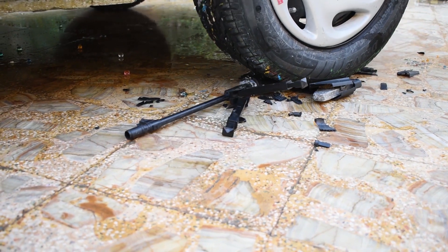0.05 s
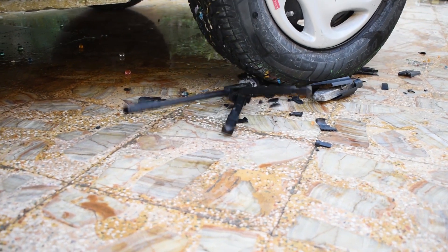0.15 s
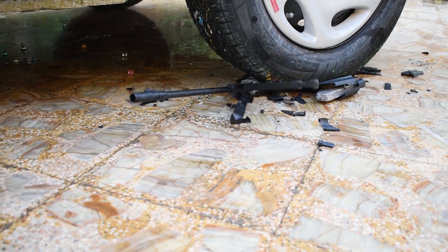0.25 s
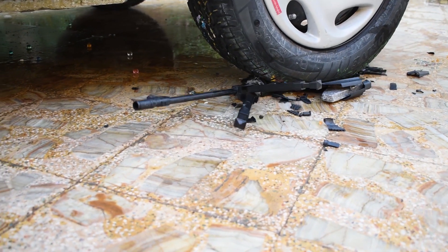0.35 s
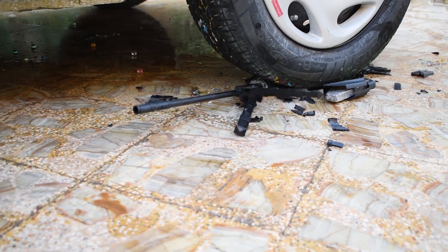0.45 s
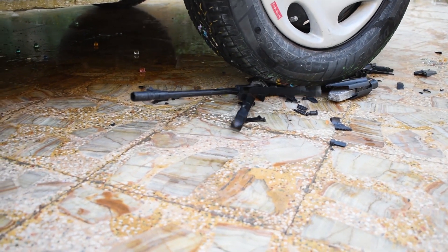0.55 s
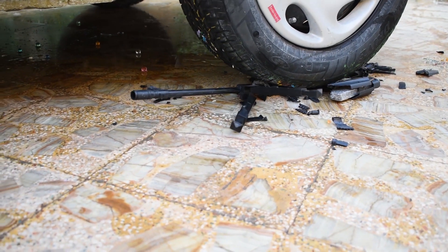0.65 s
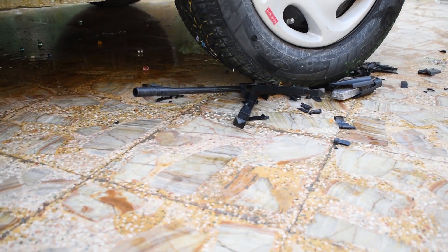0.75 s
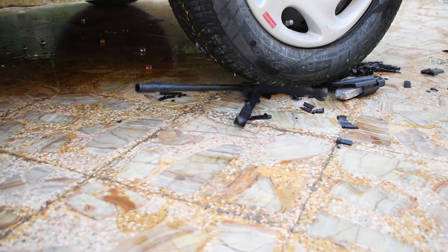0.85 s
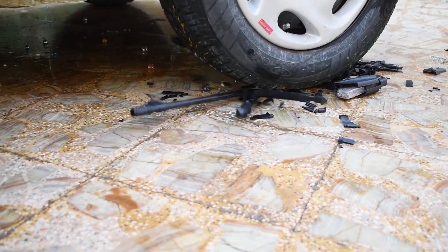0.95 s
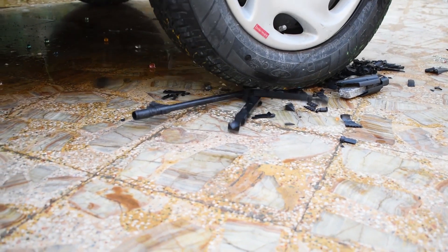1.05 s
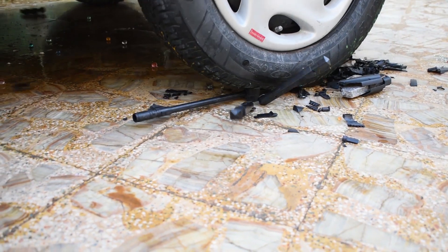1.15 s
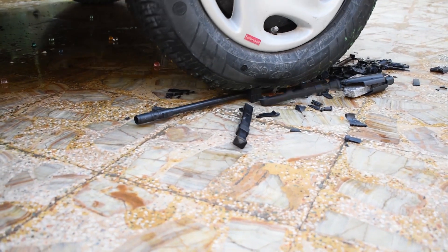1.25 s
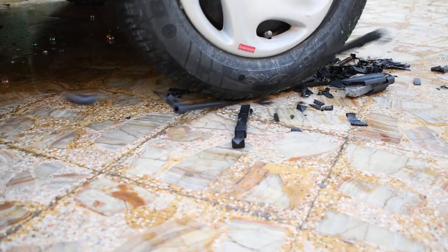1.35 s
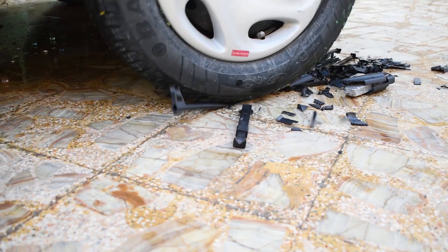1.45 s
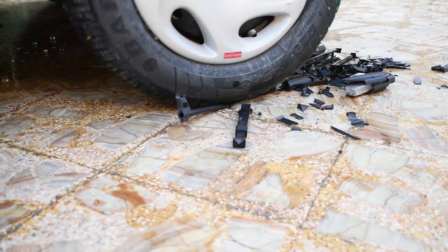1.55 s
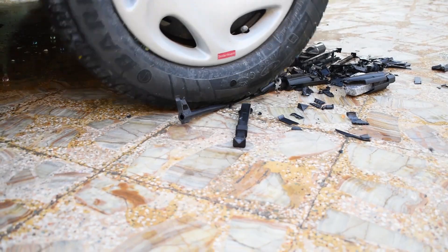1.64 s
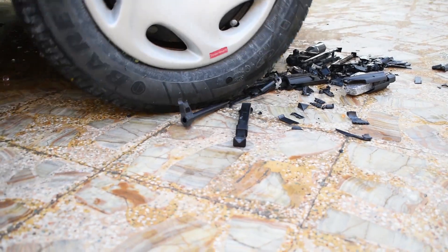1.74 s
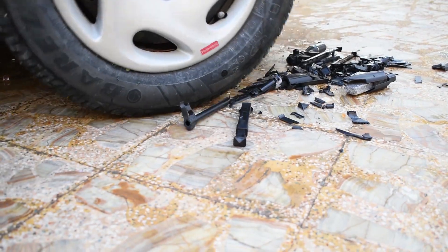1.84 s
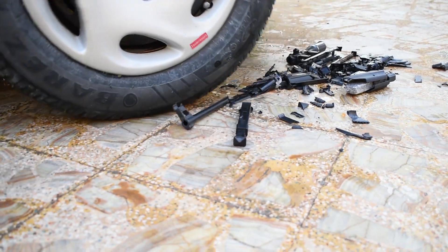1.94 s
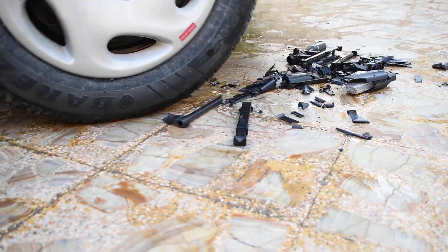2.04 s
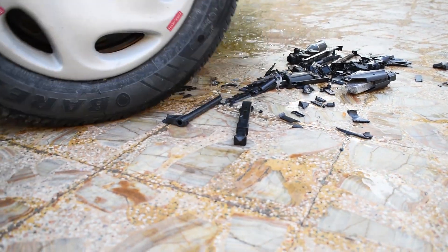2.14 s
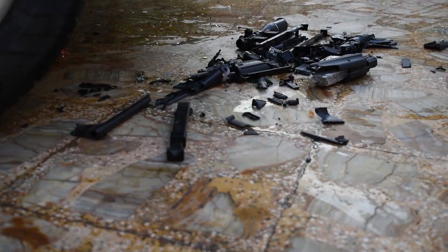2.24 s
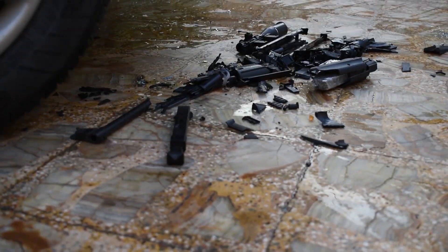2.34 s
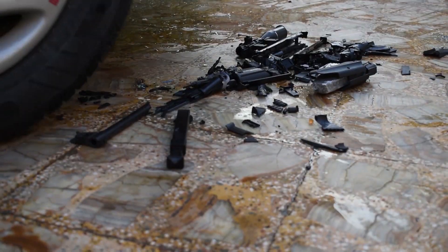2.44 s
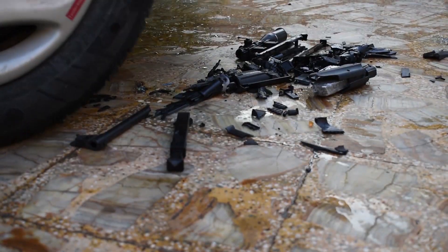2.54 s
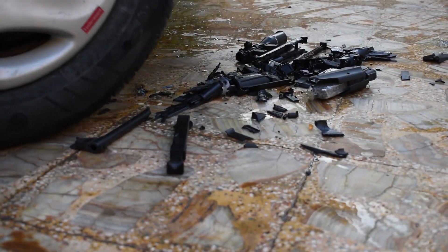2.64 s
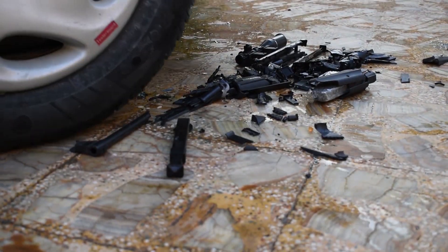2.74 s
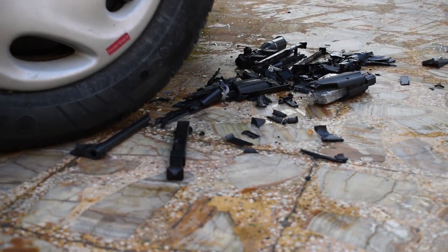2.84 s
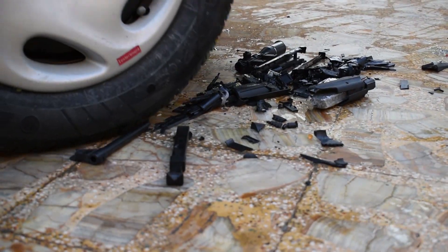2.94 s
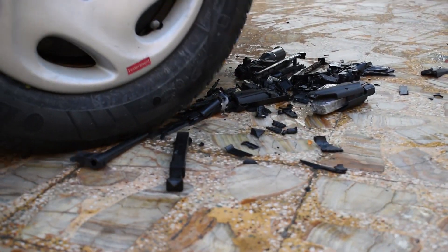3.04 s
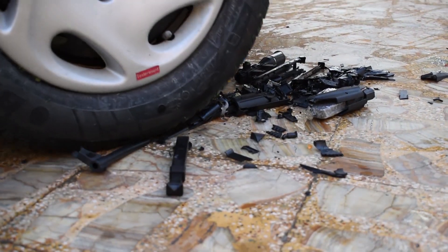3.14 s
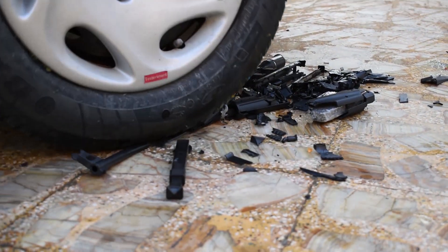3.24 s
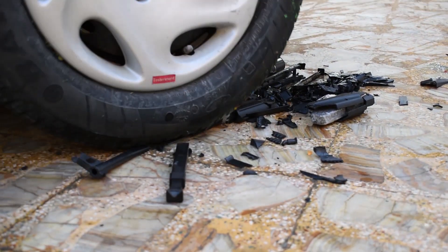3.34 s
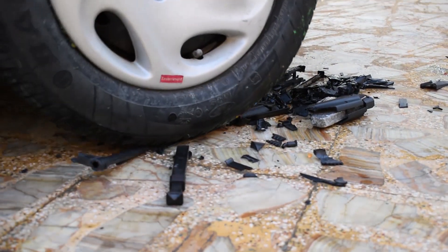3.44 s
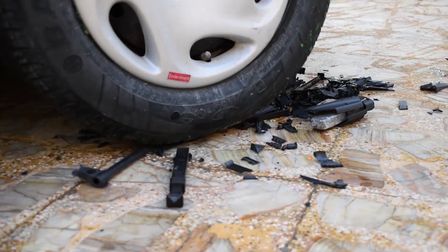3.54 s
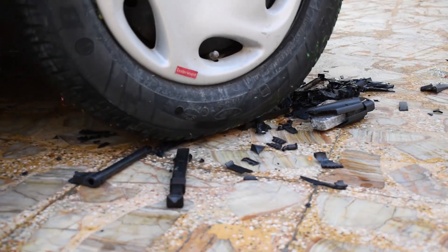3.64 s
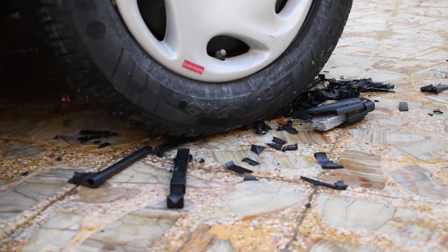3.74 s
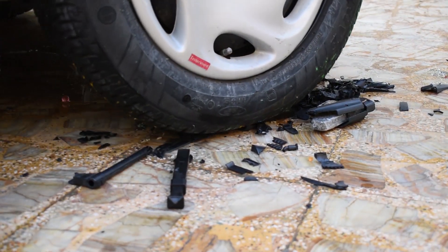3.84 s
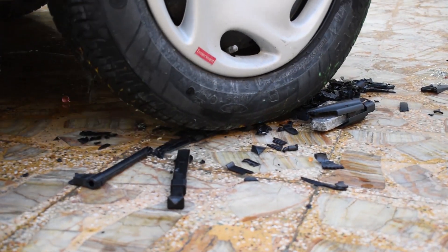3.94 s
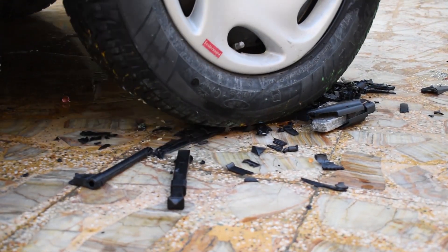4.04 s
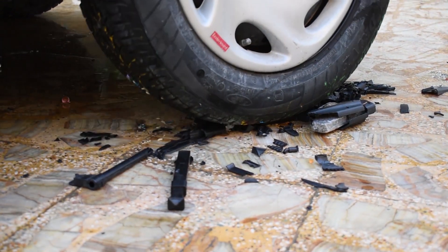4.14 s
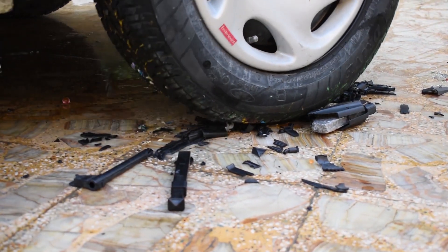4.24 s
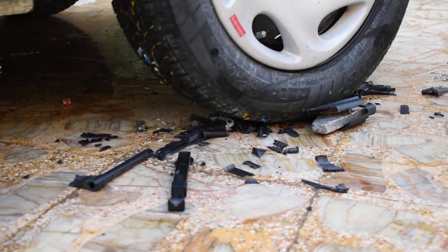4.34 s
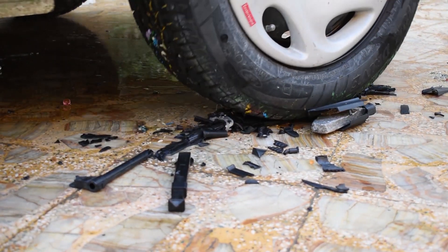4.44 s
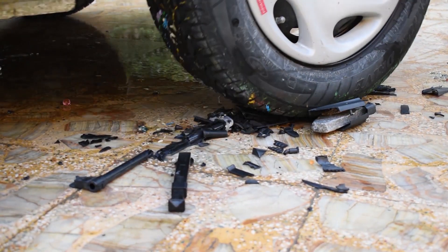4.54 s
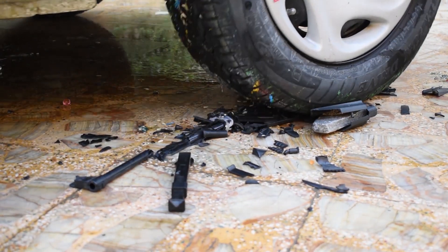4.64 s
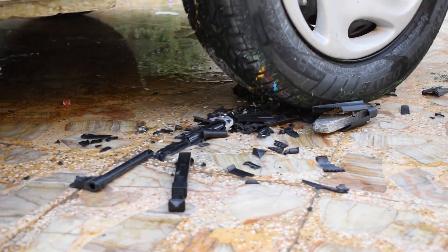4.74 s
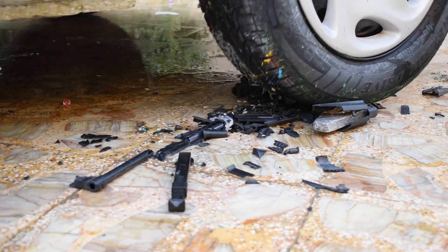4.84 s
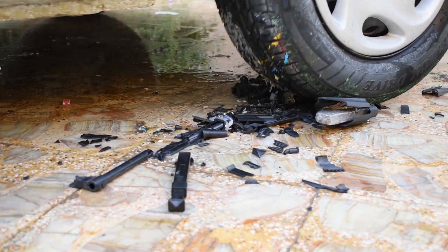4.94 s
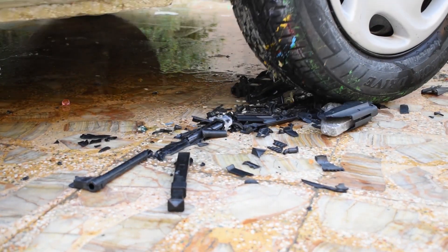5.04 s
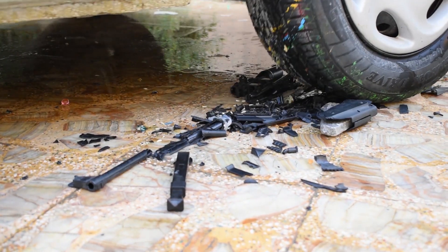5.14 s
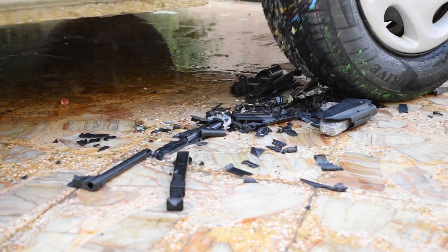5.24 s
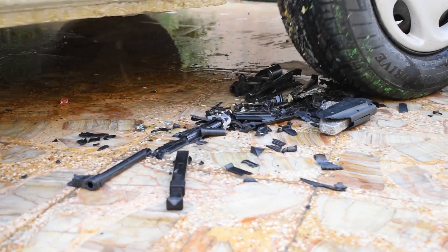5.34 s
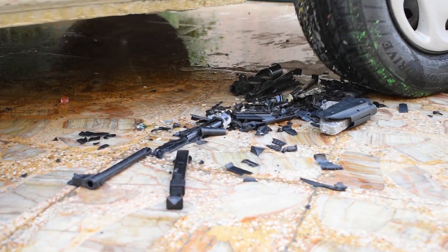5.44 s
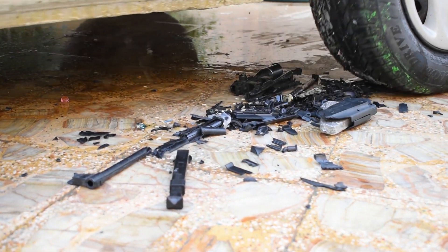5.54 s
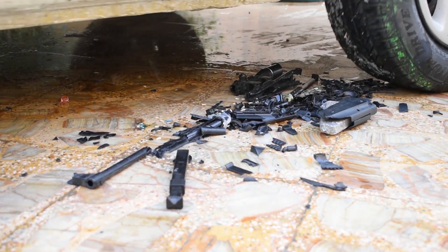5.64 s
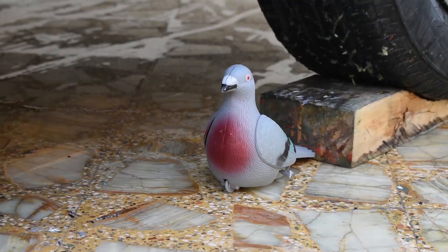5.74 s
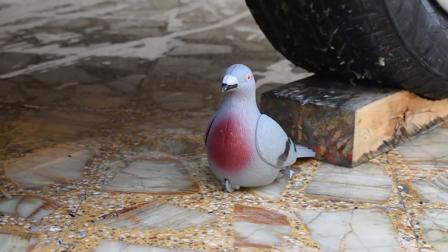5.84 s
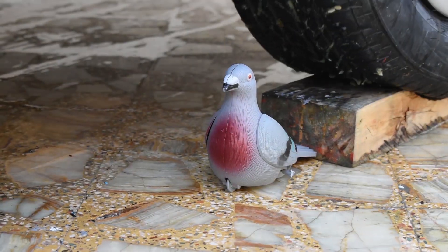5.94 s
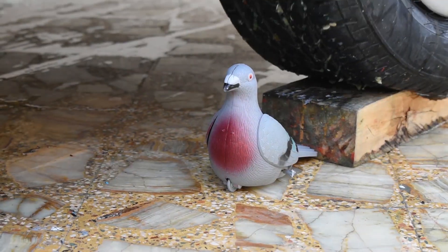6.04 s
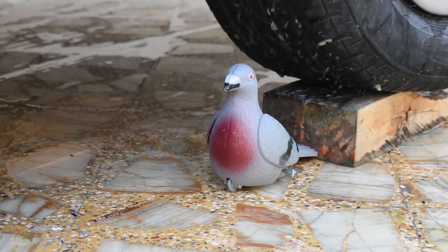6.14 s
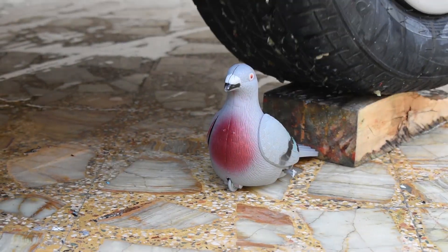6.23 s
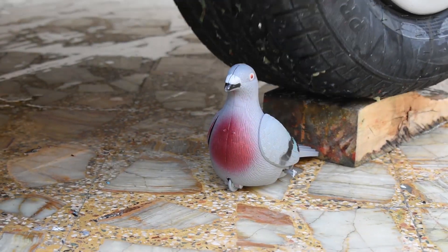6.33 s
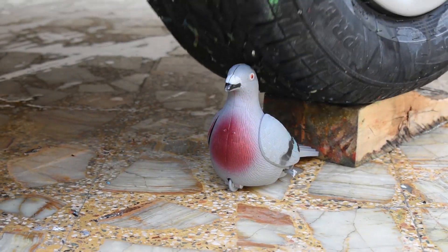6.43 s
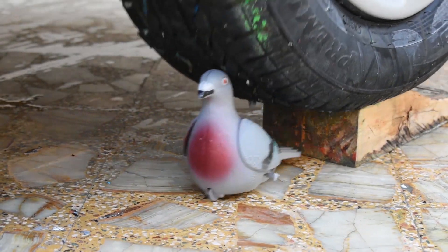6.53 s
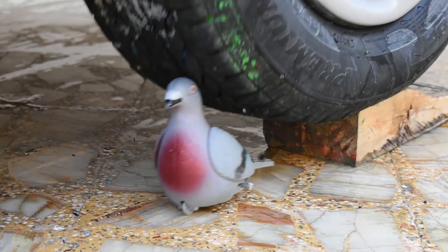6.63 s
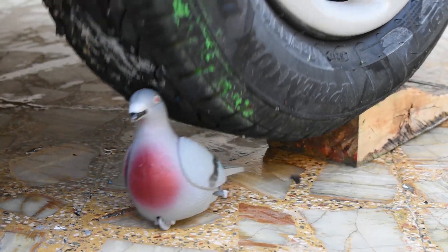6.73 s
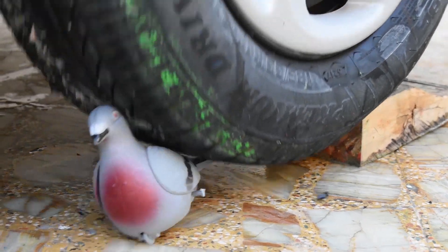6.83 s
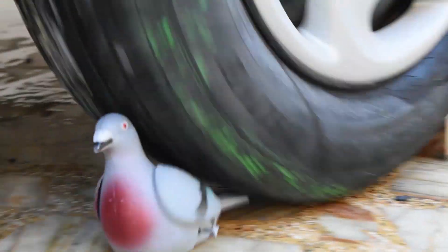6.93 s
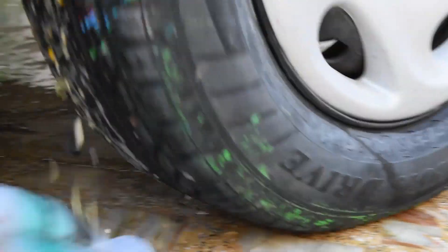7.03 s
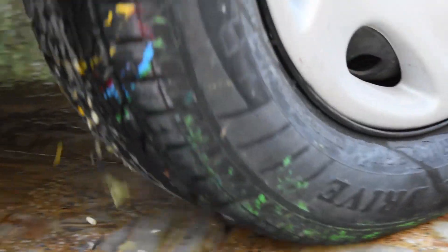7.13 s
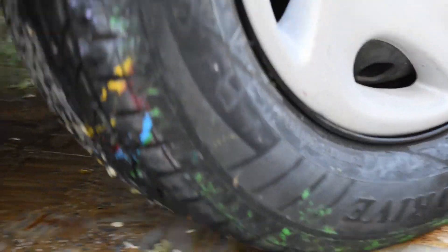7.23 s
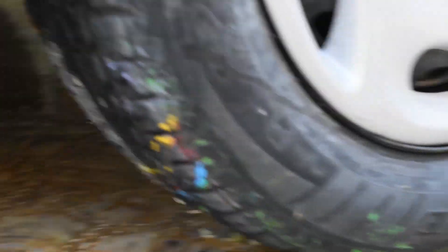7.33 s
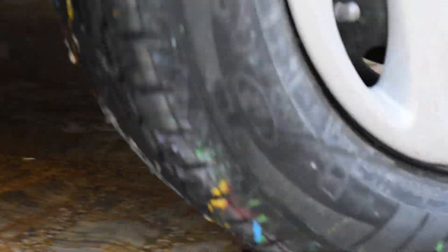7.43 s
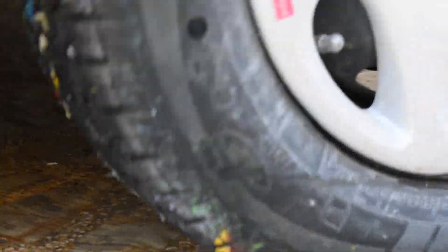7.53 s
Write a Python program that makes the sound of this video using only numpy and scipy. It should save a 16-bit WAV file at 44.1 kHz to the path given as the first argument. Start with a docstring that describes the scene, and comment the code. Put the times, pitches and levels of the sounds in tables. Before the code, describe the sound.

Heard close beside the tyre in a hard, echoing tiled yard. From 0 s a low engine hum near 65 Hz, with rumble and whirr, lies under splintery crackle. Sharp plastic snaps begin at once; at 0.2 s a shell caves in with a tyre thump. Snaps and clicks continue, with a collapse near 1 s and the loudest, a hollow crunch, at 1.4 s. Crackle thins out by 1.9 s. At 2.3 s the engine changes abruptly to a lower note and mostly runs alone. A snap at 3.1 s leads to a long run of softer cracks, pops and hollow knocks from 3.5 to 5.5 s, with thumps at 3.9, 4.3 and 5.2 s and a brief hum swell at 4.8 s. A tiny silence at 5.8 s, then a higher, whirring engine. At 7.0 s comes a duller crunch and thump, then faint crackle as the hum falls.

```python
"""A car creeps over hollow plastic toys on a tiled yard, heard from beside the tyre.
From the start its exhaust hums at the firing rate over rumble and whirr, in three stretches of engine
sound that each start abruptly, and splinters crackle under the tread. Running cracks soon snap and knock
hollow shells, thin chips click, collapses thump the tyre from 0.2 s and crumbs scrunch from 1.4 s. The hum
swells near 4.8 s; all sound is absent for 28 ms near 5.8 s. The yard echoes the plastic throughout."""
import sys
import numpy as np
from scipy import signal
from scipy.fft import rfft, irfft, next_fast_len
from scipy.io import wavfile
from scipy.ndimage import map_coordinates

SR = 44100
rng = np.random.default_rng(int(sys.argv[2]) if len(sys.argv) > 2 else 0)


def to_wav(sig):
    """Store sig (one row per channel, or 1-D mono) as 16-bit WAV at the path in sys.argv[1].

    Samples outside -1..1 are clipped; the rate is SR.
    """
    pcm = np.clip(np.atleast_2d(sig), -1, 1) * 32767
    pcm = np.round(pcm).astype(np.int16)
    wavfile.write(sys.argv[1], SR, pcm.T)  # frames by channels


N = 334273
TIME = np.arange(N) / SR

# Cracks that run through a part: (time [s], tear length [s], crack level [dB], shell level [dB])
SNAP_EVENTS = [(0.0532, 0.0016, -13.5, -19.5), (0.199, 0.0029, -13, -30.5), (0.2046, 0.0039, -11, -11),
               (0.4797, 0.0011, -18, -26), (0.554, 0.0046, -18.5, -25), (0.634, 0.0049, -19.5, -23.5),
               (0.906, 0.01, -22.5, -24), (0.9725, 0.0057, -12, -12.5), (1.3812, 0.0042, -10, -4),
               (1.406, 0.0025, -19, -29), (1.606, 0.0055, -37, -28.5), (3.1168, 0.0013, -20.5, -31),
               (3.289, 0.00046, -24, -23.5), (3.9285, 0.0043, -22, -17.5), (4.1712, 0.00086, -33, -28.5),
               (4.248, 0.00093, -40.5, -23), (4.287, 0.0057, -26.5, -14), (4.475, 0.0016, -25, -23),
               (4.561, 0.0026, -22, -17), (4.6192, 0.0014, -32, -21.5), (4.656, 0.0031, -22.5, -26.5),
               (4.7158, 0.0011, -33, -19.5), (4.7997, 0.0025, -34.5, -27.5), (4.8325, 0.0011, -35.5, -23.5),
               (4.87, 0.0025, -32.5, -25.5), (5.051, 0.0043, -26, -31), (5.1717, 0.0026, -25.5, -23),
               (5.326, 0.0014, -35, -23), (5.386, 0.0016, -29.5, -27.5), (5.5062, 0.00068, -22, -19),
               (7.037, 0.0066, -48, -22.5), (7.1183, 0.00075, -36.5, -25.5)]
# A part gives way and the tyre drops: (time [s], level [dB], t60 [s])
TYRE_DROPS = [(0.205, -24, 0.14), (.975, -21.5, 0.31), (1.382, -17, 0.2), (3.117, -43.5, 0.19),
              (3.93, -33, 0.21), (4.291, -25, 0.31), (5.175, -23, 0.14), (7.039, -30, 0.39)]
# The tread presses on one part after another:
# (start [s], end [s], splinter gain [dB], shell pitch [Hz])
TREAD_PRESSES = [(0, .65, -41, 854), (0.84, 1.298, -45.5, 788), (1.373, 1.499, -32, 471),
                 (1.598, 1.88, -42.5, 1350), (2.023, 2.14, -51, 1400), (3.101, 3.29, -72, 1540),
                 (3.491, 4.3, -42.5, 982), (4.535, 4.72, -38, 700), (4.773, 5.2, -41.5, 960),
                 (5.38, 5.547, -41, 1330), (7.025, 7.05, -43, 667), (7.12, 7.4, -50, 1455)]
# Spectrum of breaking plastic: (frequency [Hz], relative level [dB])
CRACK_SPECTRUM = [(600, -25.5), (1500, -15.5), (2800, -2.5), (4500, 5), (7000, -1.5), (12000, -3),
                  (16000, -5.5)]
# Spectrum of a hollow toy: (frequency [Hz], relative level [dB])
SHELL_SPECTRUM = [(60, -4), (280, 3), (2000, -1), (3000, -9.5), (6000, -40.5)]
# Spectrum of the tyre: (frequency [Hz], relative level [dB])
TYRE_SPECTRUM = [(25, -18.5), (150, 5), (330, -2), (900, -12), (3000, -47)]


def amp(db):
    """Level to amplitude ratio: 20 dB is a factor of ten."""
    return 10 ** (np.asarray(db) / 20)


def unit(x):
    """Normalisation to a root-mean-square of 1."""
    return x / np.sqrt(np.mean(x ** 2) + 1e-20)


def along(points, hz):
    """Interpolation of (Hz, value) points on a logarithmic frequency axis."""
    f, v = np.transpose(points)
    return np.interp(np.log(hz + 1), np.log(f + 1), v)


def wobble(rate):
    """Slow random modulation: a spline through normal deviates, rate knots a second."""
    return map_coordinates(rng.standard_normal(int(N * rate / SR) + 4), [TIME * rate])


def filtered(x, response):
    """Linear filtering: the spectrum of x times a response of frequency."""
    size = next_fast_len(len(x) + SR // 8)
    hz = np.fft.rfftfreq(size, 1 / SR)
    return irfft(rfft(x, size) * response(hz), size)[:len(x)]


def shaped(x, spectrum):
    """Spectral shaping: x weighted by a table of levels over frequency."""
    return filtered(x, lambda hz: amp(along(spectrum, hz)))


def noise(spectrum):
    """Coloured noise: white noise shaped by a spectrum, at rms 1."""
    return unit(shaped(rng.standard_normal(N), spectrum))


def add(track, s, sound):
    """Superposition: mix a sound into the track at time s."""
    part = track[max(round(s * SR), 0):][:len(sound)]
    part += sound[:len(part)]


def driving():
    """Piecewise engine state: firing rate, rumble level and whirr level, stretch by stretch."""
    # Levels at the creeping firing rate: (start [s], rumble level [dB], whirr level [dB])
    stretches = [(0, -53.5, -52), (2.27, -49.5, -53.5), (5.79, -54.5, -46.5)]
    # One list per stretch: (time [s], firing rate [Hz])
    firing_rates = [
        [(0, 64.3), (.55, 66.66), (.9, 62.36), (2.25, 62.54)],
        [(3.9, 36.02), (4.85, 54.33), (5.15, 52.97), (5.45, 49.37), (5.78, 47.05)],
        [(5.8, 67.22), (6.25, 71.37), (6.5, 72.06), (6.78, 61.04), (7.14, 55.2), (7.4, 43.56)],
    ]
    state = np.zeros((3, N))
    for (start, rumble_db, whirr_db), rates in zip(stretches, firing_rates):
        times, hz = np.transpose(rates)
        firing_hz = np.interp(TIME, times, hz)
        now = (TIME >= start) | (state[0] == 0)
        state = np.where(now, np.broadcast_arrays(firing_hz, rumble_db, whirr_db), state)
    return state


def cyclic(phase, levels_db, size=1024):
    """Fourier synthesis: a wave of rms 1 that repeats every turn, with the given harmonic levels."""
    harmonics = amp(levels_db) * np.exp(2j * np.pi * rng.random(len(levels_db)))
    wave = irfft(np.append(0, harmonics), size)
    angle = np.arange(size) * 2 * np.pi / size
    return unit(np.interp(phase, angle, wave, period=2 * np.pi))


def bonnet(x):
    """Fixed body resonances: panels colour engine noise at the same frequencies at any speed."""
    # Noise under the bonnet: (frequency [Hz], relative level [dB])
    whirr_spectrum = [(130, -10.5), (240, 2), (620, 0.5), (1290, -0.5), (2000, -3), (4400, -8), (9000, -22),
                      (16000, -34)]
    # Narrow resonances of the car's body: (frequency [Hz], boost [dB])
    panel_modes = [(248, 8.5), (600, 6), (1285, 6)]
    width = 0.031  # half-width of a resonance, as a share of its frequency

    def response(hz):
        boost_db = sum(db / (1 + ((hz / centre - 1) / width) ** 2) for centre, db in panel_modes)
        return amp(along(whirr_spectrum, hz) + boost_db)

    return unit(filtered(x, response))


def car(count=130):
    """Periodic combustion gives a harmonic hum and a clatter per crank turn, over broadband noise."""
    # Exhaust harmonics: (multiple of the firing rate, relative level [dB])
    exhaust_orders = [(1, 2.5), (2, -15), (3, -12), (4, -12)]
    # Two exhaust resonances met as the speed varies: (firing rate [Hz], hum level before the surge [dB])
    exhaust_resonances = [(36, -55), (47, -53), (54, -39.5), (60, -42), (63, -43), (68.5, -39.5), (72, -44)]
    # Low engine noise: (frequency [Hz], relative level [dB])
    rumble_spectrum = [(15, -41.5), (90, 0.5), (250, -0.5), (450, -6.5), (2000, -41.5), (12000, -75)]
    # Steady hiss: (frequency [Hz], relative level [dB])
    hiss_spectrum = [(3300, -18.5), (4600, 12.5), (6300, -9.5), (15000, -51.5)]
    creep_hz, db_per_octave = 60, 6  # rumble and whirr grow with the firing rate

    firing_hz, rumble_db, whirr_db = driving()
    effort_db = db_per_octave * np.log2(firing_hz / creep_hz)
    rumble_db, whirr_db = rumble_db + effort_db, whirr_db + effort_db
    phase = 2 * np.pi * np.cumsum(firing_hz * (1 + .0022 * wobble(13))) / SR

    # The hum swells briefly by 5 dB near 4.8 s
    surge_db = 5 * np.exp(-((TIME - 4.8) / 0.034) ** 2)
    orders = np.arange(1, count + 1)
    hum_wave = cyclic(phase, along(exhaust_orders, orders[:len(exhaust_orders)]))
    hum = amp(along(exhaust_resonances, firing_hz) + surge_db) * hum_wave

    # Two firings make one crank turn, hence half the phase
    clatter_db = 3 * rng.standard_normal(count) - 30 * (orders / count) ** 3
    clatter = amp(whirr_db + wobble(10)) * bonnet(cyclic(phase / 2, clatter_db))

    rumble = amp(rumble_db + wobble(4.6)) * noise(rumble_spectrum)
    whirr = amp(whirr_db - 3) * bonnet(rng.standard_normal(N))
    beat = 1 + 0.2 * np.cos(phase)  # each firing shakes the block
    return hum + clatter + beat * (rumble + whirr) + amp(-69.5) * noise(hiss_spectrum)


def grinding():
    """Load-driven fracture: gain held while the tread presses, with a fading shower after each collapse."""
    attack_s, release_db_per_s = 0.01, 105.5  # the load builds fast and eases off as the tyre moves on
    shatter_db, shatter_db_per_s = -12.5, 76  # shower relative to its thump, and its fading
    gain = np.zeros(N)
    for start, end, db, _ in TREAD_PRESSES:
        rise = np.clip((TIME - start) / attack_s + 1, 0, 1)  # complete at the start time
        release_db = release_db_per_s * np.maximum(TIME - end, 0)
        gain = np.maximum(gain, rise * amp(db - release_db))
    for s, db, _ in TYRE_DROPS:
        shower_db = db + shatter_db - shatter_db_per_s * np.abs(TIME - s)
        gain = np.maximum(gain, (TIME > s) * amp(shower_db))
    return gain


def tread(lumpy_db=3):
    """Rolling noise: the tyre rumbles unevenly as it climbs over the pieces."""
    level_db = -8 + lumpy_db * wobble(25)  # relative to the grinding gain
    return amp(level_db) * grinding() * noise(TYRE_SPECTRUM)


def piece(spectrum, centre_hz, focus_db, uneven_db, mode_db=0, mode_octaves=0.1, size=2048, count=130):
    """Minimum-phase ring of a plastic piece: a hump at its pitch, a main mode and chance resonances."""
    hz = np.fft.rfftfreq(size, 1 / SR)
    octave = np.log2((hz + 20) / centre_hz)
    knots = np.linspace(octave[0], octave[-1], count)
    ripple = np.interp(octave, knots, rng.standard_normal(count))
    hump = focus_db * np.log2(1 + (2 * octave) ** 2)
    mode = mode_db / (1 + (octave / mode_octaves) ** 2)
    db = along(spectrum, hz) - hump + mode + uneven_db * ripple
    # Folding the cepstrum onto positive times makes the ring causal
    cepstrum = irfft(np.log(amp(db)))
    cepstrum[1:size // 2] *= 2
    cepstrum[size // 2 + 1:] = 0
    return irfft(np.exp(rfft(cepstrum)))


def tear(length, jerk=0.43, stall_db=5, swell=0.19, size=1536, count=26):
    """Stick-slip of a running crack: uneven slips swell, stall and restart, then die as the piece parts."""
    age = (np.arange(size) + 1) / SR / max(length, 2e-4)  # in tear lengths
    slips = rng.standard_normal(size) * np.exp(jerk * rng.standard_normal(size))
    knots = np.linspace(0, age[-1], count)
    stalls = amp(stall_db * np.interp(age, knots, rng.standard_normal(count)))
    return slips * stalls * (1 - np.exp(-age / swell)) * np.exp(-.75 * age ** 1.36)


def struck(force, ring):
    """Convolution of a force with an impulse response, given the energy of 10 ms at rms 1."""
    sound = signal.fftconvolve(force, ring)
    return sound * np.sqrt(SR / 100 / np.sum(sound ** 2))


def splinter():
    """Brittle fracture of one small piece: a bright edge and a duller body, both at its own pitch."""
    pitch, hollow, span = rng.standard_normal(3)
    force = tear(0.0012 * np.exp(1.4 * span), size=384)
    edge_hz, body_hz = 5500 * np.exp(.4 * pitch), 1000 * np.exp(.2 * pitch)
    edge_ring = piece(CRACK_SPECTRUM, edge_hz, focus_db=2.5, uneven_db=4.5, size=512)
    body_ring = piece(SHELL_SPECTRUM, body_hz, focus_db=2.5, uneven_db=5.0, size=512)
    return struck(force, edge_ring) + amp(1.5 + 2.4 * hollow) * struck(force, body_ring)


def splinters(rate=130, spread_db=6.0, settle=0.024, count=1200, size=200):
    """Poisson process of small breaks, rate a second, with a slight boost just after each snap."""
    out = np.zeros(N)
    heap = [splinter() for _ in range(size)]
    times = np.cumsum(rng.exponential(1 / rate, count))
    strengths, choices = rng.standard_normal(count), rng.integers(size, size=count)
    for s, strength, which in zip(times, strengths, choices):
        add(out, s, amp(spread_db * min(strength, 1.2) - 6.5) * heap[which])
    snap_times = np.sort(np.transpose(SNAP_EVENTS)[0])
    since_snap = np.abs(TIME - snap_times[np.searchsorted(snap_times, TIME) - 1])
    boost_db = 1.3 * np.exp(-since_snap / settle)
    return out * grinding() * amp(boost_db)


def shell(s, shell_db):
    """Cavity resonance of the part nearest in time: a hollow note, or broad if flat or caving in."""
    collapse_db, flat_hz = -14, 1500  # a louder knock caves the shell in; a higher part is a flat shard
    nearest = min(TREAD_PRESSES, key=lambda press: max(press[0] - s, s - press[1]))
    part_hz = nearest[-1]
    if shell_db > collapse_db or part_hz > flat_hz:
        return piece(SHELL_SPECTRUM, part_hz, focus_db=2.8, uneven_db=1.5)
    note_hz = part_hz * np.exp(0.045 * rng.standard_normal())
    return piece(SHELL_SPECTRUM, note_hz, focus_db=1.5, uneven_db=2.5, mode_db=14)


def snaps():
    """Shared excitation: one running crack radiates a bright edge and knocks the shell around it."""
    out = np.zeros(N)
    for s, length, crack_db, shell_db in SNAP_EVENTS:
        force = tear(length)
        edge_ring = piece(CRACK_SPECTRUM, 5600, focus_db=1.0, uneven_db=3.0)
        add(out, s, amp(crack_db) * struck(force, edge_ring))
        add(out, s, amp(shell_db) * struck(force, shell(s, shell_db)))
    return out


def chips(length=0.0012, pitch_spread=0.17):
    """Impulsive excitation: a very short break rings a thin chip and faintly knocks the shell."""
    # Thin chips flick off with a click: (time [s], level [dB])
    chip_events = [(0.0618, -28), (.0705, -22), (0.076, -23.5), (0.1435, -26.5), (0.1528, -24.5),
                   (0.1612, -33), (.372, -25), (0.425, -32), (.441, -29), (0.567, -32.5), (0.6039, -24.5),
                   (.664, -28), (.815, -32.5), (.857, -26.5), (0.8707, -34), (0.885, -22.5), (1.039, -18),
                   (1.104, -24.5), (1.14, -22), (1.2978, -35), (1.4262, -20), (1.451, -22), (1.475, -25.5),
                   (1.488, -35.5), (1.523, -25.5), (1.551, -21), (1.6554, -35.5), (1.714, -34.5),
                   (1.77, -32), (2.1, -45.5), (3.392, -45.5), (3.42, -43), (3.497, -32), (3.516, -35),
                   (3.529, -35.5), (3.5638, -32.5), (3.572, -31.5), (3.629, -39), (3.647, -31.5),
                   (3.659, -40), (3.7211, -33.5), (3.741, -39.5), (3.7906, -38), (3.826, -37.5),
                   (3.845, -30), (3.864, -31.5), (3.906, -34.5), (4.002, -42), (4.042, -41.5),
                   (4.096, -37.5), (4.441, -32.5), (4.769, -33.5), (4.9484, -36.5), (5.114, -33),
                   (5.1526, -33.5), (5.423, -22), (5.465, -30), (5.593, -34), (5.723, -44.5), (7.2322, -52)]
    out = np.zeros(N)
    for s, db in chip_events:
        force = tear(length)
        knock_db = -15.5 + 0.58 * db  # grows more slowly than the crack, so hard breaks are brighter
        chip_hz = 6590 * np.exp(pitch_spread * rng.standard_normal())
        ring = piece(CRACK_SPECTRUM, chip_hz, focus_db=1.6, uneven_db=3.0)
        add(out, s, amp(db) * struck(force, ring))
        add(out, s, amp(knock_db) * struck(force, shell(s, knock_db)))
    return out


def thumps():
    """Damped impact: the tyre drops onto the flattened toy and booms with exponential decay."""
    out, t = np.zeros(N), np.arange(SR // 2) / SR
    for s, db, t60 in TYRE_DROPS:
        boom = unit(shaped(rng.standard_normal(len(t)), TYRE_SPECTRUM))
        onset = 1 - np.exp(-t / 0.0024)
        add(out, s, amp(db - 60 * t / t60) * onset * boom)
    return out


def scrunches(spread_db=8.0):
    """Granular noise: a swarm of tiny fractures swells and fades as the tread presses on crumbs."""
    # Crumbs ground against the tiles: (time of the middle [s], level [dB])
    crumb_events = [(1.374, -22), (1.74, -32.5), (1.867, -27), (2.027, -41), (3.065, -38.5), (3.096, -36),
                    (6.931, -44.5), (7.043, -27), (7.275, -40), (7.308, -33.5), (7.385, -34.5)]
    # Spectrum of the crumbs: (frequency [Hz], relative level [dB])
    crumb_spectrum = [(400, 1), (3500, 2), (15000, -16.5)]
    swell_s = 0.0045
    gain = np.zeros(N)
    for s, db in crumb_events:
        gain += amp(db) / np.cosh(np.minimum(np.abs(TIME - s) / swell_s, 20))
    grains = rng.standard_normal(N) * amp(spread_db * wobble(1400))
    return gain * unit(shaped(grains, crumb_spectrum))


def yard(x, near_db=-13, near_t60=0.11, far_db=-19, count=24):
    """Diffuse reflection: quick scatter between car body and tiles, then the longer decay of the walls."""
    # Reverberation of the walls: (frequency [Hz], t60 [s])
    wall_decay = [(600, 0.54), (5000, 0.27), (15000, 0.1)]
    out, step = np.zeros(N), N // count + 1
    for start in range(0, N, step):  # the random echo pattern is redrawn for each equal stretch of time
        hz, t, z = signal.stft(rng.standard_normal(SR // 2), SR, nperseg=256)
        decay = amp(-60 * t / along(wall_decay, hz)[:, None])
        far = signal.istft(z * decay, SR, nperseg=256)[1]
        age = np.arange(len(far)) / SR
        near = shaped(rng.standard_normal(len(far)), [(5000, 1.5), (15000, -8)])
        near *= amp(-60 * age / near_t60) * (age > .002)
        far *= np.minimum(age / 0.0047, 1)
        near_echo = amp(near_db) * near / np.linalg.norm(near)
        far_echo = amp(far_db) * far / np.linalg.norm(far)
        add(out, start / SR, signal.fftconvolve(x[start:start + step], near_echo + far_echo))
    return out


def scene(count=3):
    """Superposition of direct sound, car and echo, the echo fed by independently drawn renderings."""
    debris = splinters() + scrunches()
    direct, *echo_feeds = [snaps() + chips() + debris for _ in range(count + 1)]
    echo = sum(yard(feed) for feed in echo_feeds) / np.sqrt(count)
    return (direct + echo + thumps() + tread() + car())[None]


def record(dry):
    """Saturation and band limit: peaks clip, the sound drops out once, and a steep low-pass follows."""
    clipped = np.clip(dry[0], -1, 1)
    audible = np.abs(TIME - 5.791) > .014  # silent for 28 ms
    top_hz = 15900
    return filtered(clipped * audible, lambda hz: 1 / np.sqrt(1 + (hz / top_hz) ** 140))[None]


dry = scene()
out = record(dry)
to_wav(out)
```